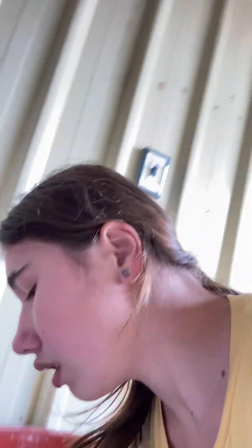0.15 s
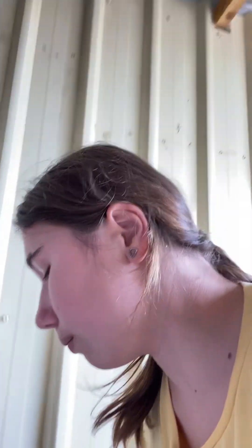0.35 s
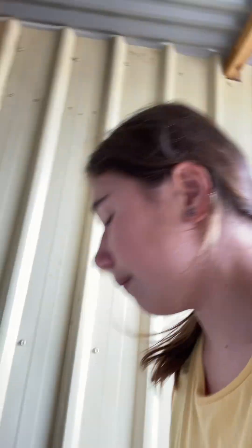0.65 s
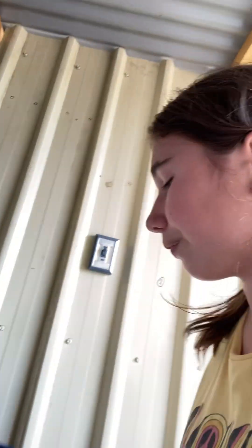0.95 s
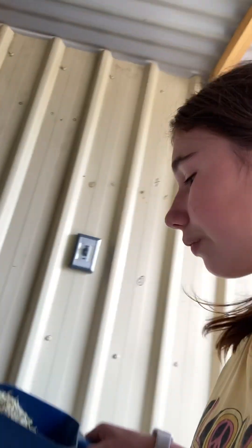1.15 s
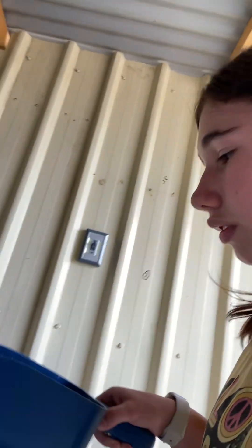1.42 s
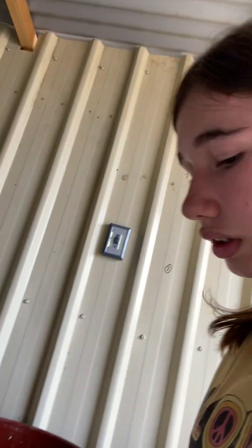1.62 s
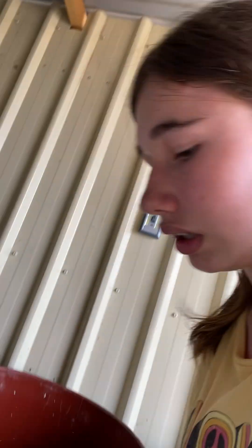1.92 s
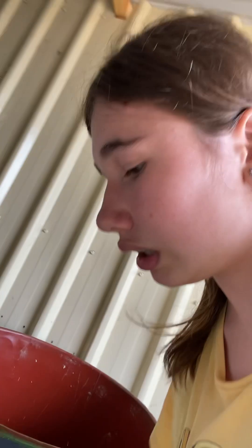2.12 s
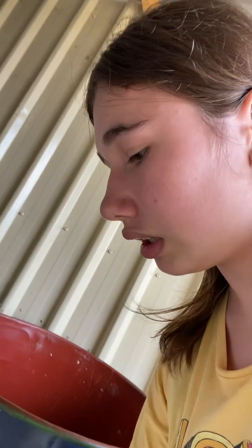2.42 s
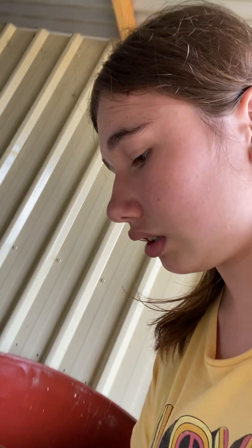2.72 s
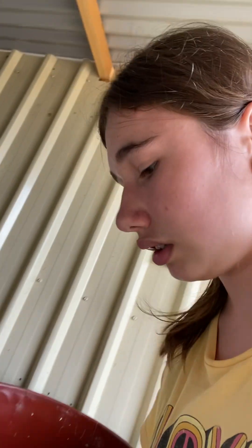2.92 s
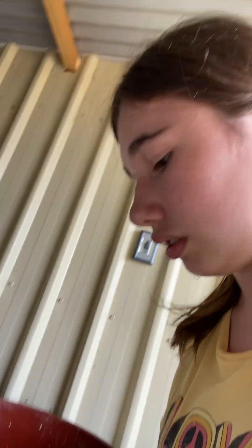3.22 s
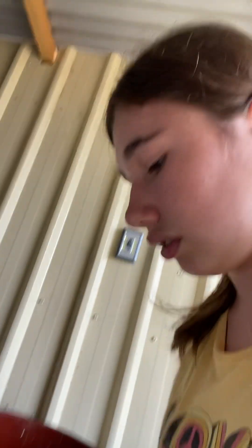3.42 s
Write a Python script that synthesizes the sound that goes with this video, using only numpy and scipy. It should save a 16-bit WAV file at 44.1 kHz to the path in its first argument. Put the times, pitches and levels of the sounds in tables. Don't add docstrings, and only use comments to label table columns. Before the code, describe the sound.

Dry chaff pours from a plastic scoop into a tub, then knocks and a hard clatter.

```python
import sys
import numpy as np
from scipy import signal
from scipy.fft import rfft, irfft, next_fast_len
from scipy.io import wavfile
from scipy.ndimage import uniform_filter1d

SR = 44100
rng = np.random.default_rng(int(sys.argv[2]) if len(sys.argv) > 2 else 0)


def put_to_file(sound):
    columns = np.atleast_2d(sound).T
    safe = np.clip(columns, -1, 1)
    whole_steps = np.round(safe * 32767)
    wavfile.write(sys.argv[1], SR, whole_steps.astype(np.int16))


def convert_level_to_amplitude(level_db):
    exponent = np.asarray(level_db, float) / 20
    return 10 ** exponent


N = 156555

# pitch_hz, level_db
TUB_MODES = [(150, -10.5), (185, -1), (245, 5.5), (335, -1), (385, -1.5), (440, 1), (545, -5.5), (630, 0.5),
             (735, -7)]
# pitch_hz, level_db
SCOOP_MODES = [(960, 0), (1235, -2), (1540, -12), (1680, -0.5), (1800, 7.5), (2110, 8), (2590, -6),
               (2860, -3), (3470, -5.5), (3830, 1.5), (4260, -36), (4830, -27)]
# pitch_hz, side_minus_mid_db
KNOCK_WIDTH = [(60, -28), (150, -18.5), (300, -16.5), (550, -3), (900, -2), (2100, -3.5), (5000, 1.5),
               (6600, -16), (9000, -3), (12500, 1)]


def evened(x):
    return x / np.sqrt(np.mean(x ** 2) + 1e-20)


def read(points, at, log=True):
    place, value = np.transpose(points)[:2]
    if log:
        return np.interp(np.log(at + 1), np.log(place + 1), value)
    return np.interp(at, place, value)


def colour(x, points, level=True):
    half = np.log(convert_level_to_amplitude(read(points, np.fft.rfftfreq(4096, 1 / SR))))
    logs = np.r_[half, half[-2:0:-1]]
    taps = np.fft.ifft(np.exp(np.conj(signal.hilbert(logs)))).real[:2048]
    if level:
        taps = taps / np.linalg.norm(taps)
    taps = taps[None] * np.ones(x.shape[:-1] + (1,))
    return signal.oaconvolve(x, taps, axes=-1)[..., :N]


def resonate(x, hz, width):
    turn = np.exp(2j * np.pi * np.cumsum(hz) / SR)
    r = np.exp(-np.pi * width / SR)
    return 2 * (turn * signal.lfilter([1 - r], [1, -r], x / turn)).real


def shed(x):
    # pitch_hz, t60_s
    decay = [(150, 0.48), (500, 0.29), (1500, 0.41), (4000, 0.29), (10000, 0.33)]
    taps = np.zeros((2, SR // 2))
    at = np.arange(200, SR // 2 - 20, 20)
    at = at + rng.integers(0, 20, (2, len(at)))
    np.put_along_axis(taps, at, rng.choice([-1., 1.], at.shape), 1)
    hz, t, z = signal.stft(taps, SR, nperseg=256)
    fading = convert_level_to_amplitude(-60 * t / read(decay, hz)[:, None])
    tail = signal.istft(z * fading, SR, nperseg=256)[1]
    return signal.fftconvolve(x, tail / np.linalg.norm(tail[0]), axes=1)[:, :N]


def chaff():
    # start_s, flow_db, cavity_db, cavity_pitch_factor
    pour = np.array([(0, -50.5, 2, 1.03), (0.198, -46, -13.5, 0.84), (.26, -43.5, -1.5, 0.93),
                     (.37, -42.5, -7.5, 1.04), (.44, -42, -8, 1.04), (.55, -46, -9, 1.04),
                     (.68, -46, -2.5, 1.01), (.8, -44.5, -8.5, 1.04), (.94, -46.5, -26, 1.1),
                     (1.03, -50.5, -22, 1.2), (1.2, -55.5, -11.5, 1.05)])
    # start_s, rise_s, hold_s, level_db
    rustles = [(1.247, 0.017, 0.024, -54.5), (1.321, 0.016, 0.011, -58), (1.405, 0.017, 0.028, -55.5),
               (1.486, 0.014, 0.023, -55.5), (1.576, 0.013, 0.042, -60.5), (1.666, 0.026, 0.036, -59),
               (1.784, 0.029, 0.058, -59), (1.858, 0.014, 0.091, -53), (2.12, 0.2, 0.18, -55),
               (2.394, 0.0088, 0.12, -41), (2.564, 0.019, 0.061, -54), (2.662, 0.0082, 0.086, -63.5),
               (2.862, 0.037, 0.057, -62.5), (2.938, 0.012, 0.12, -63.5), (3.098, 0.0091, 0.021, -46),
               (3.167, 0.014, 0.074, -54), (3.372, 0.0044, 0.012, -59)]
    # start_s, rise_s, hold_s, level_db
    trickle = (1.1, .1, 1.9, -71.5)
    # start_s, level_db
    ticks = [(2.351, -46), (2.949, -51), (3.017, -49.5), (3.068, -58), (3.097, -37.5)]
    # pitch_hz, level_db
    mid_spectrum = [(250, -52), (500, -13.5), (1000, -16.5), (2300, -6), (5000, -6.5), (8200, -4),
                    (11400, -11.5), (13000, -23.5), (16000, -42)]
    # pitch_hz, level_db
    side_spectrum = [(200, -23.5), (400, -22.5), (1800, -15), (3400, -10), (5000, -12.5), (6600, -19.5),
                     (8000, -13.5), (12500, -7), (16000, -8.5), (19000, -46)]
    # pitch_hz, width_hz, level_db
    cavity = [(2340, 390, 2.5), (2900, 270, 1), (1230, 170, -6.5), (3530, 270, -14.5)]
    husks_per_s, spread_db, settle_db_per_s = 9000, -0.5, 210
    t = np.arange(N) / SR

    stream = convert_level_to_amplitude(read(pour, t, False) - 83 * np.maximum(t - pour[-1, 0], 0))
    power = stream ** 2
    for s, rise, hold, db in rustles + [trickle]:
        fall_db = settle_db_per_s * np.maximum(t - s - rise - hold, 0)
        power = power + (np.clip((t - s) / rise, 0, 1) * convert_level_to_amplitude(db - fall_db)) ** 2

    clumps = convert_level_to_amplitude(.9 * evened(uniform_filter1d(rng.standard_normal(N), 700)))
    size = convert_level_to_amplitude(spread_db * np.minimum(rng.exponential(1, N), 5))
    size = size * (rng.random(N) < husks_per_s / SR)
    husks = np.array([evened(v) for v in size * clumps * rng.standard_normal((4, N))])
    for s, db in ticks:
        i = round(s * SR)
        power[i:i + 90] += convert_level_to_amplitude(db) ** 2

    clicks = husks[:2] * np.sqrt(power)
    clicks = clicks + convert_level_to_amplitude(-11) * shed(clicks)
    mid = colour(clicks[:1], mid_spectrum)[0]
    treble = signal.filtfilt(*signal.butter(2, 6000, "high", fs=SR), clicks[:1])
    turned = signal.hilbert(treble, next_fast_len(N))[:, :N]
    side = clicks[1:] + 0.33 * clicks[:1] - .2 * turned.real + 0.47 * turned.imag
    side = colour(side, side_spectrum)[0] * convert_level_to_amplitude(-0.5)

    hollow = 0
    pitch_factor = read(pour[:, [0, 3]], t, False)
    for hz, width, db in cavity:
        hollow = hollow + convert_level_to_amplitude(db) * resonate(husks[2:], hz * pitch_factor, width)
    hollow = evened(hollow) * stream * convert_level_to_amplitude(read(pour[:, [0, 2]], t, False))
    return np.array([mid, side]) + hollow * convert_level_to_amplitude([[0], [-2.5]])


def patchy(x):
    hz, t, z = signal.stft(x, SR, nperseg=512)
    broad = uniform_filter1d(rng.standard_normal(z.shape[1:]), size=12, axis=0)
    broad = evened(uniform_filter1d(broad, size=7, axis=1))
    return signal.istft(z * evened(convert_level_to_amplitude(1.02 * broad)), SR, nperseg=512)[1][:, :N]


def ring(modes, t60, shift):
    t = np.arange(6000) / SR
    y = sum(convert_level_to_amplitude(db - 60 * t / t60) * np.sin(2 * np.pi * hz * s * t) for (hz, db), s in zip(modes, shift))
    return y / np.linalg.norm(y)


def knocks():
    # start_s, tub_db, scoop_db, rattle_length_s
    strikes = [(0, -59.5, -64, 0.048), (0.103, -63, -72, 0.051), (0.231, -49, -82, 0.068),
               (0.337, -58, -90, 0.045), (0.534, -59, -80, 0.018), (1.139, -66, -61.5, 0.047),
               (1.259, -61, -63.5, 0.022), (1.354, -78, -47, 0.006), (1.394, -55, -83, 0.05),
               (1.494, -51, -59, 0.027), (1.515, -45.5, -56.5, 0.022), (1.551, -57, -62.5, 0.026),
               (1.602, -45, -50, 0.013), (1.651, -58, -61.5, 0.042), (1.734, -48.5, -62, 0.0029),
               (2.287, -57.5, -59, 0.029), (2.402, -41.5, -50, 0.031), (2.421, -46, -47.5, 0.016),
               (2.52, -73, -51.5, 0.024), (2.609, -49.5, -50.5, 0.024), (2.688, -54.5, -60.5, 0.078),
               (3.089, -56, -51, 0.01), (3.095, -38.5, -27, 0.024), (3.111, -32, -25, 0.031),
               (3.172, -36.5, -31, 0.012), (3.21, -44, -34, 0.015), (3.259, -43, -59, 0.021),
               (3.297, -45, -46.5, 0.0073), (3.308, -38, -43.5, 0.017), (3.358, -77.5, -65, 0.018)]
    # pitch_hz, level_db
    thud = [(47, -33), (80, -13), (263, -4.5), (736, -9.5), (1500, -21), (1950, -30), (3300, -120)]
    # pitch_hz, level_db
    clack = [(250, -30.5), (600, 1.5), (1500, 1), (2500, 0.5), (4300, -11), (5600, -15.5), (10000, -21),
             (13000, -81)]
    ring_db, detune = (0, -4), 0.0097
    dull, rung = np.zeros((2, 2, 2, N))
    draws = rng.standard_normal((len(strikes), 2, 6000 + 28))
    t = np.arange(6000) / SR
    for (s, tub_db, scoop_db, length), draw in zip(strikes, draws):
        i = round(s * SR)
        parts = [(tub_db, TUB_MODES, 0.069, 0.28 * length), (scoop_db, SCOOP_MODES, 0.028, .0015)]
        for k, (db, modes, t60, rise) in enumerate(parts):
            rattle = draw[:, :6000] * np.minimum(t / rise, 1) * convert_level_to_amplitude(db - 6.9 * (t / length) ** 2)
            if k == 0:
                rattle = signal.lfilter(*signal.butter(2, min(24 / length, 8000), fs=SR), rattle)
            dull[k, :, i:i + 6000] += rattle[:, :N - i]
            tone = ring(modes, t60, 1 + detune * draw[0, 6000 + 14 * k:])
            y = signal.fftconvolve(rattle, tone[None], axes=1)[:, :N - i]
            rung[k, :, i:i + y.shape[1]] += convert_level_to_amplitude(ring_db[k]) * y
    tub = rung[0] + colour(dull[0], thud)
    scoop = rung[1] + colour(dull[1], clack)
    tub = tub + blows() * convert_level_to_amplitude([[0], [-2]])
    wet = tub + scoop + convert_level_to_amplitude(-7) * shed(tub + scoop)
    lean = -0.064 * tub[:1] + 0.49 * scoop[:1]
    return np.array([wet[0], colour(wet[1:] + lean, KNOCK_WIDTH, False)[0]])


def blows():
    # start_s, level_db, favoured_hz
    strikes = [(.255, -44.5, 245), (.29, -42.5, 189), (1.12, -54.5, 260), (1.355, -41.5, 1870),
               (1.356, -50.5, 3630), (1.383, -52, 517), (1.408, -46.5, 404), (1.432, -47, 270),
               (1.505, -40, 540), (1.52, -40, 275), (1.555, -46.5, 310), (1.605, -42, 287),
               (1.606, -45.5, 710), (1.63, -50.5, 270), (1.661, -41, 183), (1.736, -50.5, 600),
               (1.737, -54.5, 1100), (2.403, -36, 247), (2.405, -37, 630), (2.4195, -33.5, 242),
               (2.436, -39.5, 244), (2.524, -45, 2100), (2.425, -37, 735), (2.439, -43, 700),
               (2.46, -40, 157), (2.612, -42.5, 238), (2.613, -46.5, 810), (2.64, -48, 240),
               (2.72, -47.5, 338), (3.112, -24.5, 630), (3.098, -33, 3530), (3.133, -30, 2900),
               (3.121, -21, 1230), (3.12, -38, 3780), (3.153, -24.5, 248), (3.19, -28.5, 186),
               (3.21, -31.5, 640), (3.255, -35, 245), (3.212, -41, 3600), (3.309, -26.5, 382),
               (3.311, -32, 1100), (3.314, -34, 680), (3.316, -28.5, 214), (3.366, -51.5, 298)]
    spot_octaves, rise_cycles = .35, 1.28
    out, t = np.zeros(N + 6000), np.arange(6000) / SR
    partials = [(hz, db, 0.087) for hz, db in TUB_MODES]
    partials += [(hz, db, 0.054) for hz, db in SCOOP_MODES]
    for s, db, spot_hz in strikes:
        y = 0
        for hz, mode_db, t60 in partials:
            favour_db = -10 * (np.log2(hz / spot_hz) / spot_octaves) ** 2
            y = y + convert_level_to_amplitude(0.13 * mode_db + favour_db - 60 * t / t60) * np.sin(2 * np.pi * hz * t)
        y = y * np.minimum(t * spot_hz / rise_cycles, 1)
        out[round(s * SR):][:6000] += convert_level_to_amplitude(db) * y / abs(y).max()
    return out[:N]


def grip():
    # centre_s, half_width_s, level_db
    shakes = [(.03, 0.073, -67), (.28, 0.1, -71), (.67, 0.045, -62.5), (.93, 0.04, -70),
              (1.16, 0.03, -54.5), (1.28, 0.057, -58.5), (1.47, 0.04, -43.5), (1.581, 0.023, -38.5),
              (1.69, 0.059, -45), (1.83, 0.04, -50), (1.95, 0.026, -54), (2.07, 0.11, -59.5),
              (2.35, 0.038, -50), (2.44, 0.022, -51.5), (2.555, 0.02, -52.5), (2.7, 0.064, -54),
              (3.117, 0.013, -34.5), (3.25, 0.056, -49), (3.45, 0.09, -59)]
    t = np.arange(N) / SR
    drift = rng.standard_normal((2, N))
    sway = [evened(uniform_filter1d(uniform_filter1d(v, 700), 700)) for v in drift]
    hz = 58 * np.exp(.28 * np.clip(sway[0], -1, 1.2))
    wobble = np.sin(2 * np.pi * np.cumsum(hz) / SR) * convert_level_to_amplitude(4.84 * sway[1])
    lumps = convert_level_to_amplitude(-68) + sum(convert_level_to_amplitude(db) * np.exp(-((t - s) / w) ** 2) for s, w, db in shakes)
    return np.sqrt(2) * wobble * lumps * convert_level_to_amplitude([[0], [-34]])


def air():
    # pitch_hz, level_db
    spectrum = [(60, -40.5), (100, -2.5), (250, -16), (400, -12.5), (570, -13.5), (800, -16), (1500, -17.5),
                (2500, -21.5), (4000, -21.5), (7000, -46)]
    hush_s, hush_hz, hush_db = 3.12, 2200, -16
    hz = np.fft.rfftfreq(N, 1 / SR)
    y = irfft(rfft(rng.standard_normal((2, N))) * convert_level_to_amplitude(read(spectrum, hz) - 13 * (hz < 90)), N)
    treble = signal.filtfilt(*signal.butter(2, hush_hz, "high", fs=SR), y)
    y = y - treble * (1 - convert_level_to_amplitude(hush_db)) * (np.arange(N) / SR > hush_s)
    side = colour(y[1:], KNOCK_WIDTH, False)[0]
    return convert_level_to_amplitude(-64.5) * np.array([y[0], side]) / np.std(y[0])


def squeak():
    # start_s, length_s, level_db, low_pitch_hz, high_pitch_hz
    rub = (1.655, .06, -58, 2700, 3750)
    s, length, db, *pitches = rub
    u = np.clip((np.arange(N) / SR - s) / length, 0, 1)
    wobble = uniform_filter1d(rng.standard_normal((2, 2, N)), size=130)
    y = 0
    for hz, w in zip(pitches, wobble):
        tone = np.sin(2 * np.pi * np.cumsum(hz * (1 - 0.074 * u)) / SR)
        y = y + (1 + 0.73 * evened(w)) * tone
    return convert_level_to_amplitude(db) * y * np.sin(np.pi * u) ** .5


def drone():
    # time_s, level_db, pitch_hz
    hum = np.array([(1.8, -79.5, 520), (1.97, -65, 490), (2.05, -75.5, 620), (2.15, -67.5, 560),
                    (2.3, -68, 634), (2.4, -82, 590)])
    t = np.arange(N) / SR
    hz = read(hum[:, [0, 2]], t, False)
    y = resonate(rng.standard_normal((2, N)), hz, 180)
    y = evened(resonate(y, hz, 180))
    return y * convert_level_to_amplitude(read(hum, t, False)) * convert_level_to_amplitude([[0], [-3]])


def scene():
    stream = chaff()
    rest = knocks() + squeak() + grip() + air() + drone()
    mid, side = rest + patchy(stream)
    return np.array([mid + side, mid - side])


def roll_off(x):
    return signal.sosfilt(signal.butter(12, 15900, fs=SR, output="sos"), x)


def record(dry):
    mic = signal.lfilter(*signal.butter(2, 38, "high", fs=SR), dry)
    return roll_off(mic)


dry = scene()
out = record(dry)
put_to_file(out)
```